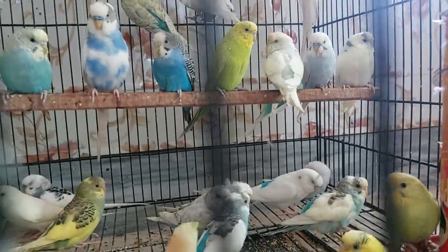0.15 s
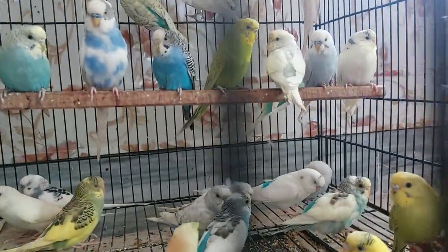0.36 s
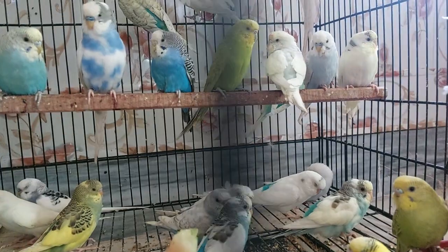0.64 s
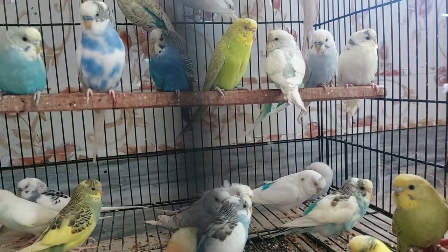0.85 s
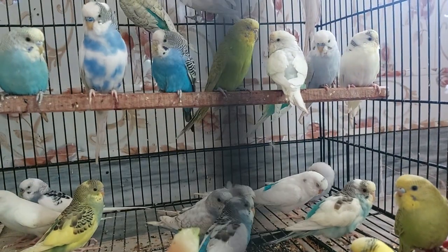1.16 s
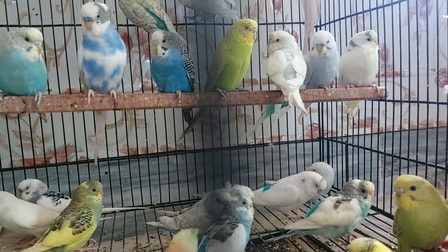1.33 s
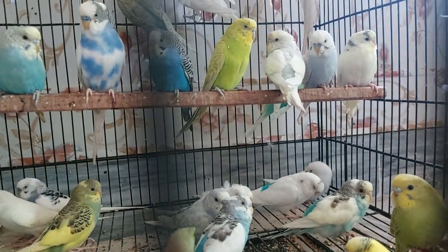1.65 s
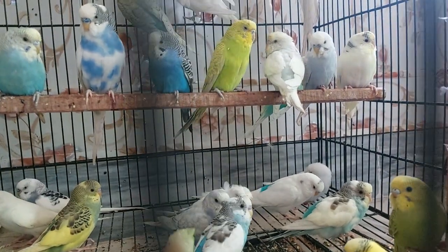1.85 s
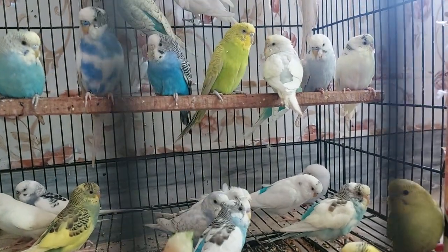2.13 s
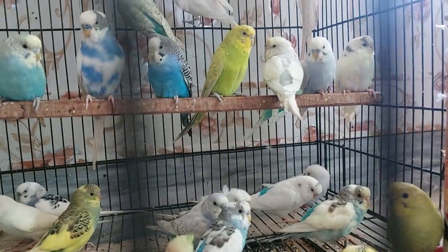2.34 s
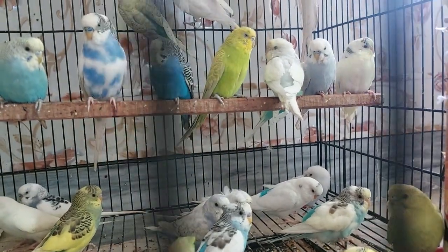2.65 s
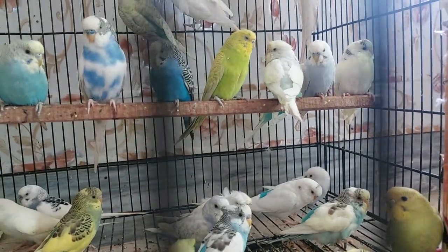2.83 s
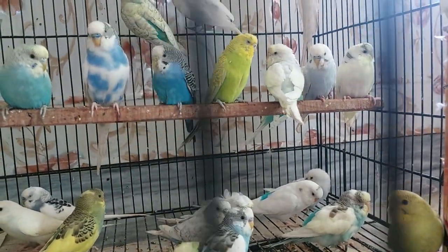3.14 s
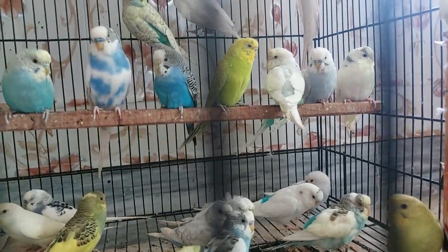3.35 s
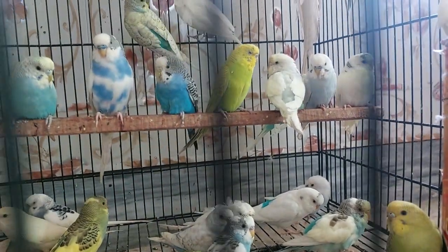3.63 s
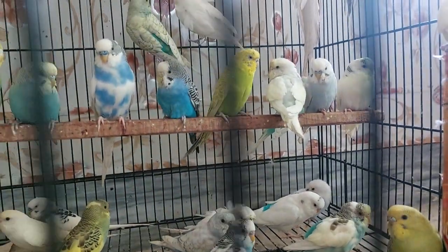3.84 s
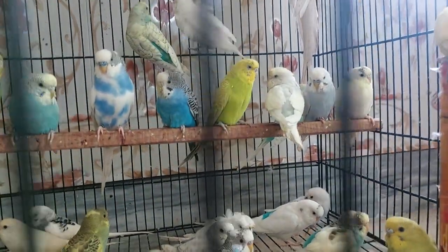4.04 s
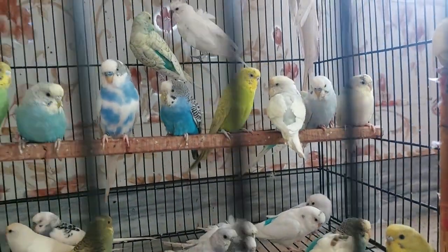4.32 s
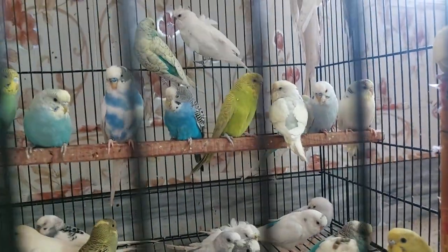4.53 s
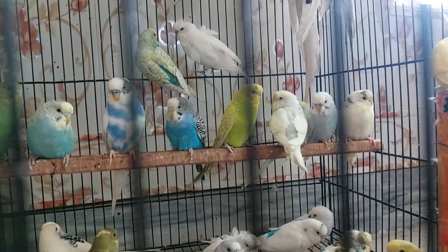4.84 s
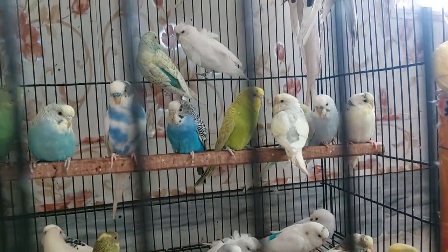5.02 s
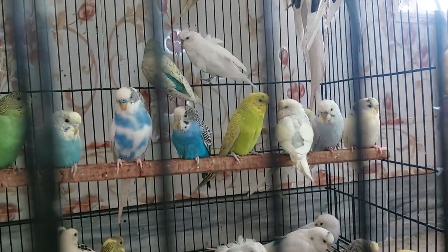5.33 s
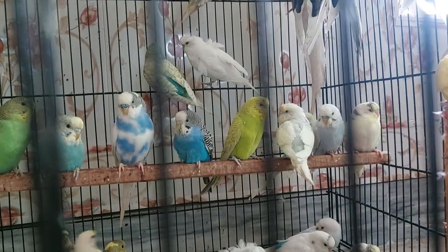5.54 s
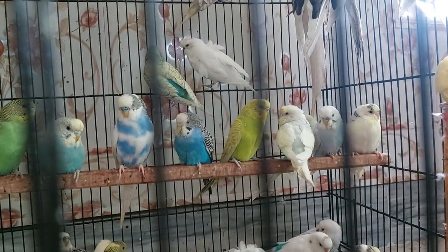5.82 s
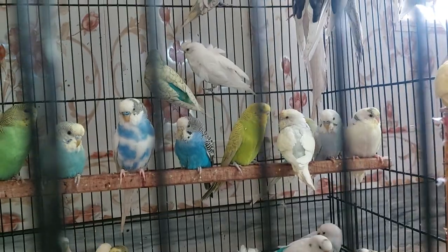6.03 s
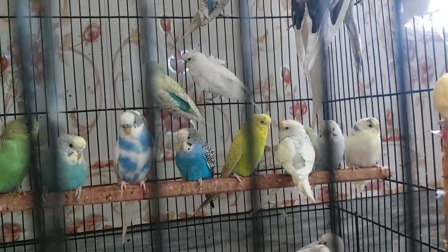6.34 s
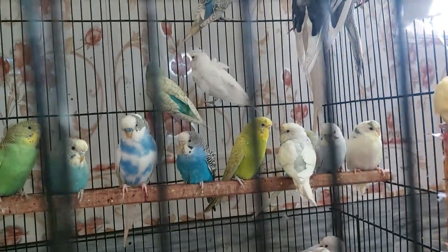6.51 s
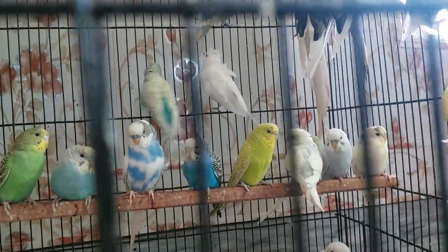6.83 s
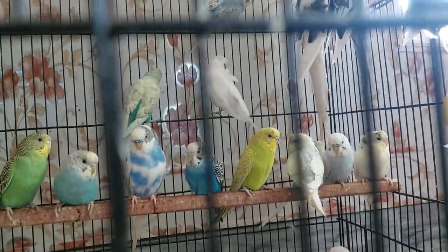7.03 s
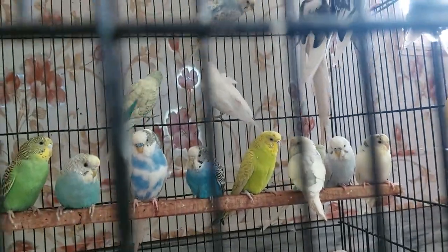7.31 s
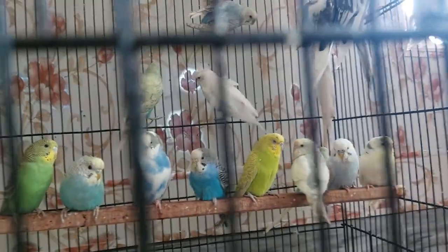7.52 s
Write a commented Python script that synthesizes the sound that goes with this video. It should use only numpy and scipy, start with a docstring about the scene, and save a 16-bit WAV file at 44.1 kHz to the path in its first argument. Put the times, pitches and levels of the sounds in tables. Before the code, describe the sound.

Piercing parakeet chirps and thin whistles over quieter buzzy calls and cage rustles, then three harsh squawks close by, in a hard-walled room.

```python
"""Budgerigars in a wire cage in a small, hard-walled room: harmonic tones glide through fixed spectral colours.
Near birds give sharp rising chirps, thin whistles, warbled notes and three loud arched squawks.
Others call nasally and chatter softly behind.
Bursts and slow swells of coloured noise make scuffs, knocks, rubs, an uneven low rumble and a soft hiss.
Random echoes and a decaying ring, fading faster at high frequencies, put the calls in the room."""
import sys
import numpy as np
from scipy import signal
from scipy.fft import rfft, irfft, next_fast_len
from scipy.io import wavfile

SR = 44100
rng = np.random.default_rng(int(sys.argv[2]) if len(sys.argv) > 2 else 0)


def output_pcm(signal):
    """Save a mono or channel-first signal as 16-bit PCM at the path in sys.argv[1].

    Samples are clipped to [-1, 1] before scaling.
    """
    pcm = np.clip(np.atleast_2d(signal).T, -1, 1) * 32767
    wavfile.write(sys.argv[1], SR, np.round(pcm).astype(np.int16))


N = 338247
TIME = np.arange(N) / SR
CUTOFF_HZ = 15900

# All table levels are in dB ahead of flutter, panning and room; colours are relative.
# Spectral colour of chirps and whistles. Each row: frequency in Hz, gain in dB.
CHIRP_COLOUR_DB = [(1700, -15.5), (2350, 7), (3300, -4), (4800, 5.5), (7000, -1), (8500, -27),
                   (10500, -5.5), (12000, -5.5), (13500, -8), (15500, -36.5)]
# Spectral colour of nasal calls and chatter. Each row: frequency in Hz, gain in dB.
NASAL_COLOUR_DB = [(580, -28), (1180, -16), (1750, -10), (2400, -2), (3500, 0), (4150, -3), (4750, 0),
                   (5600, -13), (8500, -29), (12000, -18), (16000, -35)]


def from_db(db):
    """Decibels to amplitude ratio."""
    return 10 ** (np.asarray(db) / 20)


def rms_one(x):
    """Scales to an rms of 1."""
    return x / np.sqrt(np.mean(x ** 2) + 1e-20)


def at_hz(points, hz):
    """Reads a table on a log-frequency axis."""
    known_hz, values = np.transpose(points)
    return np.interp(np.log(np.maximum(hz, 1)), np.log(known_hz), values)


def in_time(curve):
    """Reads a curve at every sample."""
    return np.interp(TIME, *np.transpose(curve))


def in_steps(start_s, steps):
    """Turns steps of (s taken, pitch Hz reached, level dB reached) into a contour in time."""
    taken_s, pitch_hz, level_db = np.transpose(steps)
    return np.transpose([start_s + np.cumsum(taken_s), pitch_hz, level_db])


def tremor(size, rate_hz):
    """Smooth random wobble of spread 1: noise through a double one-pole lowpass."""
    pole = np.exp(-2 * np.pi * rate_hz / SR)
    noise = rng.standard_normal(2 * size)
    smooth = signal.lfilter([1], [1, -2 * pole, pole * pole], noise)
    return rms_one(smooth[size:])  # the filter has settled by here


def coloured_noise(colour):
    """Stereo noise with the given spectrum, rms 1."""
    size = next_fast_len(N)
    gain = from_db(at_hz(colour, np.arange(size // 2 + 1) * SR / size))
    spectrum = rfft(rng.standard_normal((2, size))) * gain
    return rms_one(irfft(spectrum, size)[:, :N])


def syrinx(contour, colour, jitter, jitter_hz, flutter_db, edge_s, count,
           slope_db=0, rasp=0, rasp_below_hz=SR):
    """One call: a membrane's harmonics glide through a fixed colour; slack, low pitch beats unevenly."""
    s, pitch_hz, level_db = np.transpose(contour)
    span = (TIME >= s[0]) & (TIME <= s[-1] + edge_s)
    t, out = TIME[span], np.zeros(N)
    pitch_hz = np.interp(t, s, pitch_hz)
    slack = 1 / (1 + (pitch_hz / rasp_below_hz) ** 8)
    wobble = (jitter + rasp * slack) * tremor(SR, jitter_hz)[:len(t)]
    phase = 2 * np.pi * np.cumsum(pitch_hz * (1 + wobble)) / SR
    k = np.arange(1, count + 1)[:, None]
    gains = from_db(at_hz(colour, k * pitch_hz) + slope_db * np.log2(k))
    gains = gains * (k * pitch_hz < CUTOFF_HZ)
    power = np.sum(gains ** 2, axis=0) / 2
    tone = np.sum(gains * np.sin(k * phase), axis=0) / np.sqrt(power)  # the colour leaves the level alone
    edges = np.clip(np.minimum(t - t[0], t[-1] - t) / edge_s, 0, 1)
    flutter = flutter_db * tremor(SR, jitter_hz)[:len(t)]
    out[span] = tone * edges * from_db(np.interp(t, s, level_db) + flutter)
    return out


def chirp_contour(start_s, rasp_s, climb_s, hold_s, end_note_s, top_hz, sagged_hz, leap_db, top_db):
    """A low rasp, an octave leap, a climb through a level dip, a sagging top, sometimes a lower end note."""
    rasp_from_hz, rasp_to_hz, rasp_db = 2550, 2240, leap_db - 9
    leap_hz, leap_s = 4830, 0.0047
    dip_hz, dip_db = (leap_hz + top_hz) / 2, (leap_db + top_db) / 2 - 4
    end_note_hz, end_note_db, end_drop_s = 4850, -19, 0.0036
    steps = [(0, rasp_from_hz, rasp_db), (rasp_s, rasp_to_hz, rasp_db),
             (leap_s, leap_hz, leap_db), (climb_s / 2, dip_hz, dip_db),
             (climb_s / 2, top_hz, top_db), (hold_s, sagged_hz, top_db)]
    if end_note_s > 0:
        steps += [(end_drop_s, end_note_hz, end_note_db), (end_note_s, end_note_hz, end_note_db)]
    return in_steps(start_s, steps)


def chirps():
    """A rasping start leaps up into a high, nearly clean note."""
    # Each row: start in s, rasp length in s, climb length in s, hold on the top in s, end note length in s,
    # top pitch in Hz, pitch it sags to in Hz, level of the leap in dB, level of the top in dB,
    # brightness in dB per octave.
    chirp_rows = [(-.006, 0.0065, 0.0092, 0.0081, 0.00097, 7040, 6690, -17, -23, -1),
                  (0.335, 0.0095, 0.0057, 0.0044, 0.0085, 6670, 6424, -16, -25.5, 1),
                  (4.027, 0.0015, 0.0032, .011, 0.0092, 7450, 7050, -27, -33.5, 7.5),
                  (4.603, 0.0055, .011, 0.016, 0, 6785, 6620, -14.5, -20.5, 5),
                  (5.004, 0.01, 0.01, 0.016, 0.0023, 7085, 6343, -14, -18.5, 0),
                  (5.559, .006, 0.013, 0.0129, 0, 6810, 6626, -15.5, -15, 2.5),
                  (5.663, 0.0067, 0.011, 0.0098, 0, 7440, 6550, -20.5, -21, 2.5),
                  (6.157, 0.0084, 0.009, 0.016, 0, 6800, 6440, -21.5, -18.5, 0)]
    return sum(syrinx(chirp_contour(*row), CHIRP_COLOUR_DB, jitter=.011, jitter_hz=700, rasp=.05,
                      rasp_below_hz=4200, edge_s=.0012, flutter_db=1.0, slope_db=bright_db, count=7)
               for *row, bright_db in chirp_rows)


def nasal_colour(beak_hz, beak_db=6.5, beak_width_hz=220):
    """The nasal colour with one more resonance, set by how far the beak opens."""
    hz = np.geomspace(NASAL_COLOUR_DB[0][0], CUTOFF_HZ, 150)
    beak = beak_db * np.exp(-((hz - beak_hz) / beak_width_hz) ** 2)
    return np.transpose([hz, at_hz(NASAL_COLOUR_DB, hz) + beak])


def nasal_calls(scoop=.14, droop=0.053, swell_db=6, rest_hz=580, sag=.36):
    """Buzzy calls that swell and droop: those near the resting pitch scoop up, the higher ones slide down."""
    # Each row: start in s, length in s, pitch ahead of its bends in Hz, peak level in dB, beak resonance in Hz.
    call_rows = [ (0.0, 0.16, 616.4, -41.5, 3650), (0.212, 0.13, 899, -43, 3300),
                 (0.602, 0.09, 598, -54.5, 2400), (0.887, 0.17, 562, -54.5, 2200),
                 (1.025, 0.16, 584.4, -50, 2850), (1.198, 0.11, 581, -55, 2400),
                 (1.668, 0.12, 583, -58, 2900), (2.985, 0.22, 600.5, -47.5, 4420),
                 (3.264, 0.15, 881.6, -46, 3300), (3.612, 0.17, 601, -46, 2350),
                 (3.808, 0.11, 587, -54.5, 2900), (4.154, 0.23, 604.6, -46, 3250),
                 (4.808, 0.14, 923, -47.5, 3500), (4.978, 0.3, 600, -46.5, 3080),
                 (5.798, 0.18, 581, -55.5, 4100), (7.424, 0.29, 584.4, -68, 2600)]
    least_jitter, hoarse_per_db = .0055, .0008  # softer calls are hoarser
    out, along = 0, np.linspace(0, 1, 20)
    loudest_db = max(db for *_, db, _ in call_rows)
    for start_s, length_s, hz, level_db, beak_hz in call_rows:
        slides = hz > 1.25 * rest_hz
        arch = 1 - scoop * (not slides) * (1 - along) ** 7 - droop * along ** 5
        pitch_hz = (hz + sag * (rest_hz - hz) * along) * arch
        swell = swell_db * (np.sin(np.pi * along) - 1)
        contour = np.transpose([start_s + length_s * along, pitch_hz, level_db + swell])
        jitter = least_jitter + hoarse_per_db * (loudest_db - level_db)
        out = out + syrinx(contour, nasal_colour(beak_hz), jitter=jitter, jitter_hz=205,
                           flutter_db=2.5, edge_s=0.027, count=26)
    return out


def burst(start_s, t60_s, rise_s):
    """A quick rise and an exponential fade."""
    age_s = np.maximum(TIME - start_s, 0)
    return np.minimum(age_s / rise_s, 1) * from_db(-60 * np.minimum(age_s / t60_s, 2))


def cage_noises(boom_db=-7, knock_t60_s=.16):
    """Grainy scuffs that boom the tray, dull knocks, an uneven low rumble and a soft hiss that comes and goes."""
    # Feet and feathers on wire and perch. Each row: start in s, level in dB, fade t60 in s, crispness 0-1.
    scuff_rows = [(1.356, -47, 0.4, 0.14), (1.593, -50.5, 1, 0.56), (1.755, -43, 0.26, 0.07),
                  (2.163, -43, 0.53, 0.26), (2.396, -46, 0.36, 0.87), (2.749, -51, 0.53, 0.9),
                  (3.31, -51, 0.9, 0.6), (6.047, -56, 0.6, 0.9)]
    # Dull perch knocks. Each row: start in s, level in dB.
    knock_rows = [(0.789, -41), (1.353, -45), (2.278, -46), (3.24, -48)]
    # Dull scuff, crisp scuff, tray and hiss spectra. Each row: frequency in Hz, gain in dB.
    dull_colour, crisp_colour = [(200, -28.5), (850, 2), (2500, 3.5), (8000, -22)], [(1000, -0.5), (8500, -17.5), (12000, -6.5)]
    tray_colour, hiss_colour = [(30, -29.5), (65, 4.5), (170, -7), (240, 0), (400, -6), (1800, -27)], [(500, -12), (2500, 9.5), (4200, -2.5), (7000, -9.5),
                                                     (13000, -19.5), (16000, -19.5)]
    # Background: tray rumble, and the soft hiss of rustle, distant chatter and room ring.
    # Each row: time in s, level in dB.
    tray_level, hiss_level = [(1.25, -63.5), (1.4, -63.5), (2.35, -59), (2.58, -64.5), (5.2, -66),
                              (5.8, -63), (7.67, -81)], [(0.0, -41.5), (0.8, -69), (1.6, -68), (2.6, -83),
                                                  (3.4, -55.5), (4.3, -63), (4.48, -73), (4.87, -66),
                                                  (6.14, -65)]

    # crisp scuffs snap at once, dull ones take longer to swell
    strokes = np.array([from_db(db) * burst(start_s, t60_s, rise_s=.001 + .012 * (1 - crispness))
                        for start_s, db, t60_s, crispness in scuff_rows])
    scuffs = strokes.sum(axis=0)
    crisp = np.array(scuff_rows)[:, -1] @ strokes
    knocks = sum(from_db(db) * burst(start_s, knock_t60_s, rise_s=0.0003) for start_s, db in knock_rows)

    grain = from_db(2 * tremor(N, 250))
    dull_noise = (scuffs - crisp) * coloured_noise(dull_colour)
    crisp_noise = crisp * coloured_noise(crisp_colour)
    scratch = grain * (dull_noise + crisp_noise)
    hiss = from_db(in_time(hiss_level) + 2.0 * tremor(N, 40)) * coloured_noise(hiss_colour)
    tray = from_db(in_time(tray_level) + 2.4 * tremor(N, 9)) * coloured_noise(tray_colour)
    boom_colour = [(150, -17), (245, 9.5), (400, -26.0), (900, -53.5)]
    boom = from_db(boom_db) * scuffs * coloured_noise(boom_colour)
    perch = knocks * coloured_noise([(60, -10), (300, 10.5), (800, -15.0), (5000, -55)])
    return scratch + hiss + tray + boom + perch


def warble_contour(start_s, length_s, first_hz, last_hz, level_db):
    """A straight glide at an even level, then a quick fading fall."""
    fall_s, fall_to, fade_db = .028, .84, -4
    return in_steps(start_s, [(0, first_hz, level_db), (length_s, last_hz, level_db),
                              (fall_s, fall_to * last_hz, level_db + fade_db)])


def warbles():
    """Low notes, clear or husky, over a row of faint overtones."""
    # Each row: start in s, glide length in s, first pitch in Hz, pitch at the glide's end in Hz, level in dB,
    # pitch unsteadiness as a share.
    warble_rows = [(0.384, 0.065, 1370, 1470, -42.5, .008), (0.605, 0.078, 1500, 1570, -40, .005),
                   (5.392, 0.03, 1450, 1320, -51, .008), (5.481, .035, 1370, 1300, -56, .015),
                   (5.732, 0.08, 1950, 1270, -51, .05), (5.856, 0.04, 2080, 1884, -45.5, .06)]
    # Spectral colour. Each row: frequency in Hz, gain in dB.
    warble_colour = [(2100, 0), (2800, -18), (6000, -18), (15000, -34.5)]
    return sum(syrinx(warble_contour(*row), warble_colour, jitter=jitter, jitter_hz=200,
                      flutter_db=2.0, edge_s=0.0045, count=10) for *row, jitter in warble_rows)


def whistle_contour(start_s, top_hz, end_hz, level_db):
    """Rises, holds, falls and rests on its end pitch, swelling until it gets there."""
    from_hz, swell_db = 5100, 10.5
    rise_s, hold_s, fall_s, rest_s = .022, .03, .028, 0.016
    half_db = level_db - swell_db / 2
    return in_steps(start_s, [(0, from_hz, level_db - swell_db), (rise_s, top_hz, half_db),
                              (hold_s, top_hz, half_db), (fall_s, end_hz, level_db),
                              (rest_s, end_hz, level_db)])


def whistles():
    """Almost pure notes, some with a slight quaver, some shaken into a haze."""
    # Each row: start in s, top pitch in Hz, end pitch in Hz, level in dB, pitch unsteadiness as a share.
    whistle_rows = [(1.226, 5820, 5580, -48.5, 0.041), (1.47, 5886, 4416, -34, 0.0067),
                    (2.192, 5940, 5290, -37.5, 0.025)]
    return sum(syrinx(whistle_contour(*row), CHIRP_COLOUR_DB, jitter=jitter, jitter_hz=296,
                      flutter_db=1, slope_db=-22.0, edge_s=0.0039, count=2)
               for *row, jitter in whistle_rows)


def chatter(pitch_spread=0.055):
    """Soft runs of quick arched syllables, each a little different in timing, pitch and strength."""
    # Each row: bout start in s, bout end in s, level in dB.
    bouts = [(1.847, 2.16, -73), (2.761, 3.0, -74.5), (3.3, 3.95, -70)]
    syllable_s, mean_top_hz, arch = 0.074, 1406, 0.31  # arch: share by which the ends lie lower
    out, along = 0, np.linspace(0, 1, 10)
    for first_s, last_s, level_db in bouts:
        for start_s in np.arange(first_s, last_s - syllable_s / 2, syllable_s):
            late, higher, louder = rng.standard_normal(3)
            top_hz = mean_top_hz * (1 + pitch_spread * higher)
            pitch_hz = top_hz * (1 - arch * (2 * along - 1) ** 2)
            s = start_s + syllable_s * (along + late / 10)
            contour = np.transpose([s, pitch_hz, np.full_like(along, level_db + 2 * louder)])
            out = out + syrinx(contour, NASAL_COLOUR_DB, jitter=.035, jitter_hz=300,
                               flutter_db=3, edge_s=.01, count=4)
    return out


def rubs(level_db=-54, count=7):
    """A quick, even run of strokes, each swelling and fading: a hush around one hollow resonance."""
    # Each row: frequency in Hz, gain in dB.
    rub_colour = [(450, -26), (850, -10.5), (1300, -21.5), (5000, -106)]
    first_s, period_s, width_s = 3.403, 0.1719, .042
    strokes = sum(np.exp(-((TIME - first_s - k * period_s) / width_s) ** 2) for k in range(count))
    return from_db(level_db) * strokes * coloured_noise(rub_colour)


def squawk_contour(start_s, length_s, peak_hz, level_db, count=60):
    """Scoops up, sags to a lower shelf and collapses as the breath ends; level attacks, fades, releases."""
    scoop_from_hz, scoop_s = 550, 0.025
    sag_hz, sag_at_share, sag_spread_share = 369.4, .53, .17  # shares of the length
    collapse_hz, collapse_s = 538, .02
    attack_s, release_s, edge_db, fade_db_per_s = 0.048, 0.043, -12.5, 15
    age_s = np.linspace(0, length_s, count)
    scoop = (peak_hz - scoop_from_hz) * np.exp(-(age_s / scoop_s) ** 2)
    sag = sag_hz * (1 + np.tanh((age_s / length_s - sag_at_share) / sag_spread_share)) / 2
    collapse = collapse_hz * np.exp((age_s - length_s) / collapse_s)
    effort = np.minimum(np.minimum(age_s / attack_s, (length_s - age_s) / release_s), 1)
    level = level_db + edge_db * (1 - effort) - fade_db_per_s * age_s
    return np.transpose([start_s + age_s, peak_hz - scoop - sag - collapse, level])


def squawks():
    """A rough upward scoop, then a quavering arch led by its second harmonic and frayed in the upper ones."""
    # Each row: start in s, length in s, peak pitch ahead of its bends in Hz, level ahead of its fade in dB.
    squawk_rows = [(6.209, 0.22, 2269, -15.5), (6.54, 0.2, 2267, -15.5), (6.851, 0.18, 2236, -16.5)]
    # Spectral colour. Each row: frequency in Hz, gain in dB.
    squawk_colour = [(600, -14), (1400, -16), (2100, -16), (2700, -3.5), (4400, -1), (5200, -17),
                     (6700, -16), (8500, -16.5), (10500, -17.5), (13000, -27.5)]
    return sum(syrinx(squawk_contour(*row), squawk_colour, jitter=.0055, jitter_hz=450, rasp=.05,
                      rasp_below_hz=1300, flutter_db=1.2, edge_s=0.0056, count=14) for row in squawk_rows)


def room_response(early_db, early_t60_s=0.0068, gap_s=0.0018):
    """Diffuse ring that dies band by band, led by sparse bounces off the near wall and the cage."""
    # Each row: band centre in Hz, t60 in s.
    ring_t60 = [(1500, 0.49), (6500, 0.42), (14000, 0.27)]
    t = TIME[:SR]
    white, hz = rfft(rng.standard_normal((2, SR))), np.arange(SR // 2 + 1)
    tail = 0
    for k, (_, t60_s) in enumerate(ring_t60):
        share = at_hz([(row[0], j == k) for j, row in enumerate(ring_t60)], hz)  # bands crossfade
        tail = tail + irfft(white * share, SR) * np.exp(-np.log(1000) * t / t60_s)
    sparse = rng.standard_normal((2, SR)) * (rng.random((2, SR)) < 900 / SR)  # about 900 bounces per s
    bounces = sparse * np.exp(-np.log(1000) * t / early_t60_s)
    parts = np.array([tail, bounces]) * (t > gap_s)
    tail, bounces = parts / np.linalg.norm(parts, axis=-1, keepdims=True)
    return tail + from_db(early_db) * bounces


def place(call, room_db, early_db, lag_ms, pan_db=-4.5):
    """A bird's spot: direct sound, right channel lagging by lag_ms, plus room; all louder on the right."""
    direct = np.array([call, np.roll(call, round(lag_ms * SR / 1000))])
    room = signal.fftconvolve(call[None], room_response(early_db), axes=1)[:, :N]
    return (direct + from_db(room_db) * room) * from_db([[pan_db / 2], [-pan_db / 2]])


def scene():
    """Places each kind of call in the room and adds the cage noises."""
    near = place(chirps(), room_db=1.5, early_db=-0.5, lag_ms=-.38)
    far = place(nasal_calls(), room_db=1.0, early_db=4.5, lag_ms=0.13)
    low = place(warbles(), room_db=-10, early_db=-1, lag_ms=0.13)
    thin = place(whistles(), room_db=-1.5, early_db=-14, lag_ms=-0.41)
    behind = place(chatter(), room_db=8, early_db=-6, lag_ms=0)
    loud = place(squawks(), room_db=-0.15, early_db=-1.5, lag_ms=.44)
    cage = (cage_noises() + rubs()) * from_db([[-1.2], [1.2]])
    return near + far + low + thin + behind + loud + cage


def record(dry, lopsided_left=2.3, lopsided_right=0.42, thump_hz=220):
    """Each microphone bends loud waves to one side, a soft thump under them; peaks round off, top is cut."""
    rounded = 1.4 * np.tanh(dry / 1.4)
    bend = rounded ** 4 * [[lopsided_left], [lopsided_right]]
    thump = signal.sosfilt(signal.butter(1, [50, thump_hz], "band", fs=SR, output="sos"), bend)
    top_cut = signal.ellip(10, .1, 80, CUTOFF_HZ, fs=SR, output="sos")
    return signal.sosfilt(top_cut, rounded + thump)


dry = scene()
out = record(dry)
output_pcm(out)
```